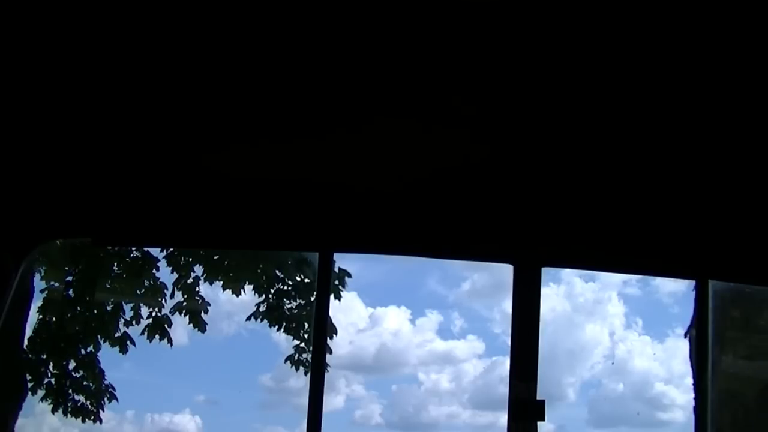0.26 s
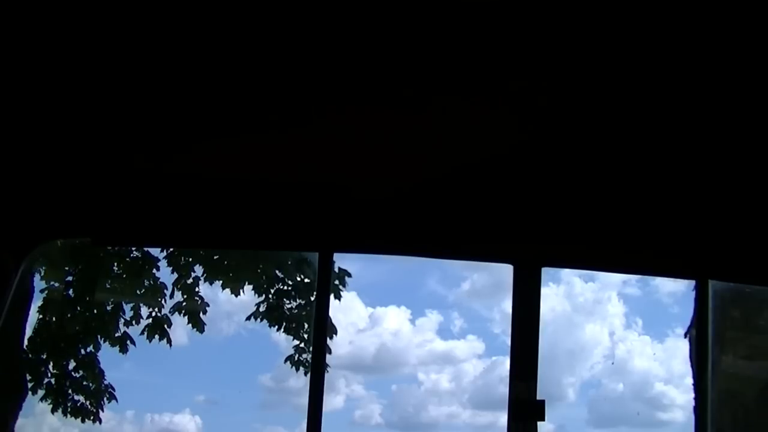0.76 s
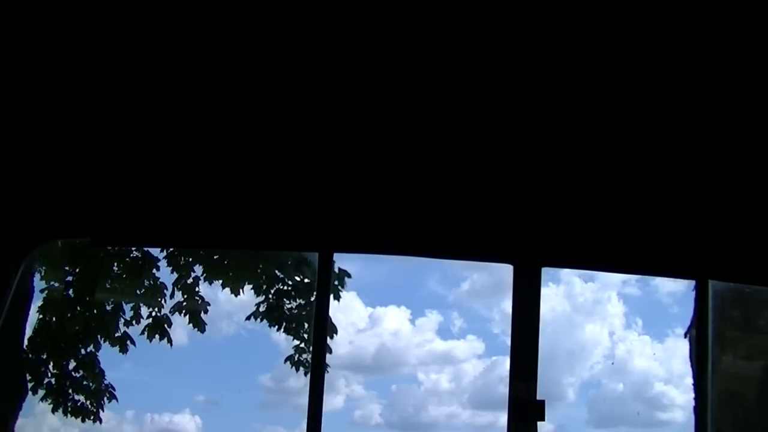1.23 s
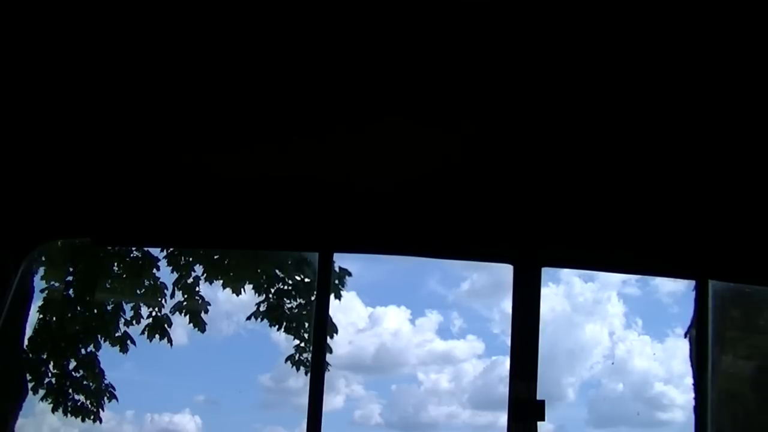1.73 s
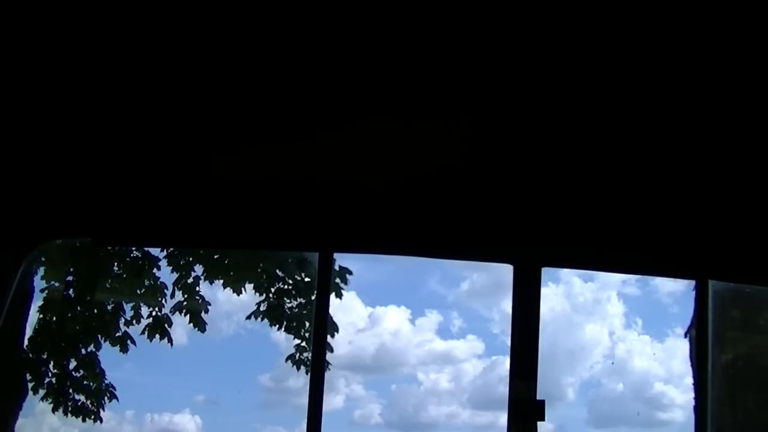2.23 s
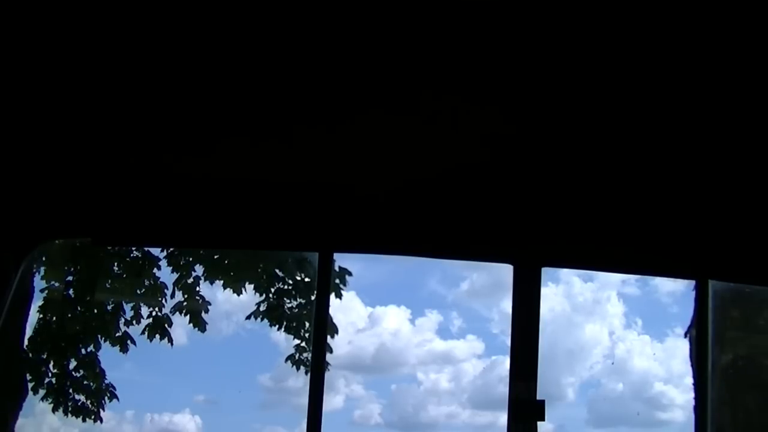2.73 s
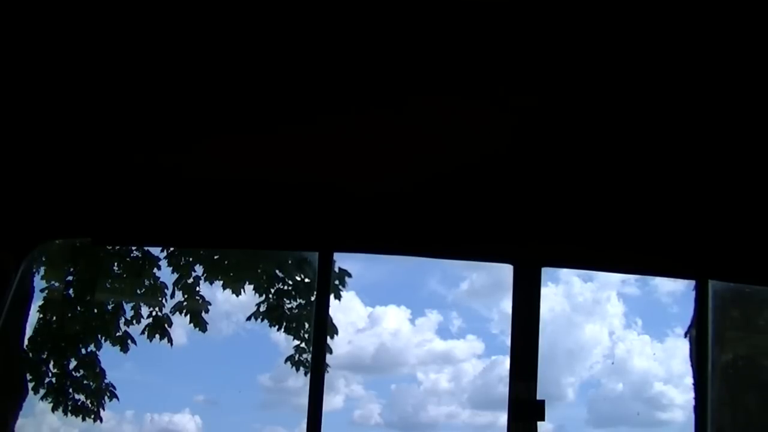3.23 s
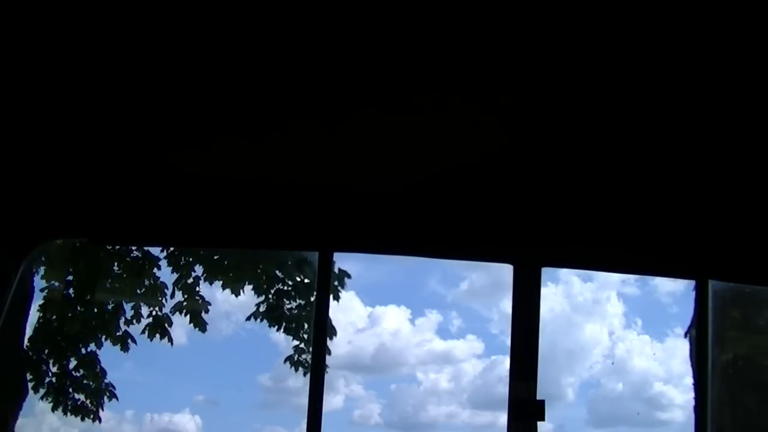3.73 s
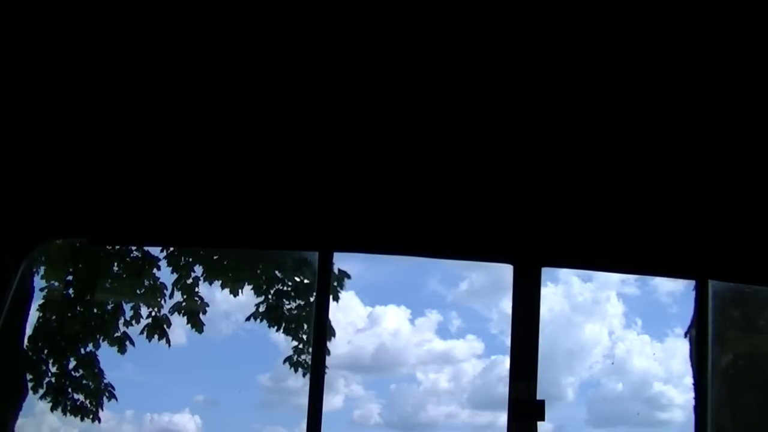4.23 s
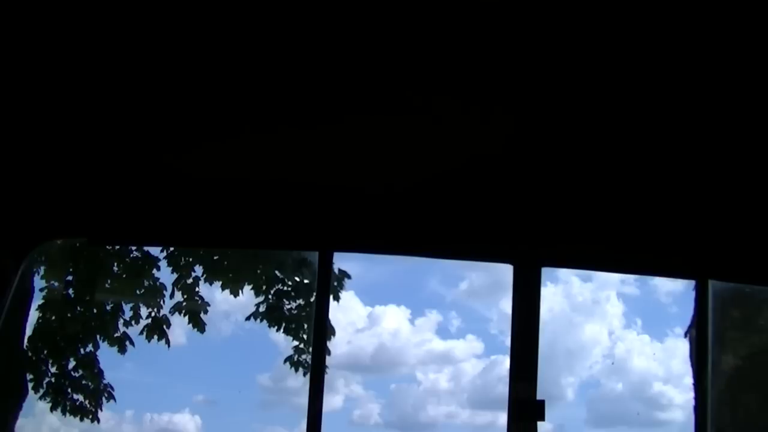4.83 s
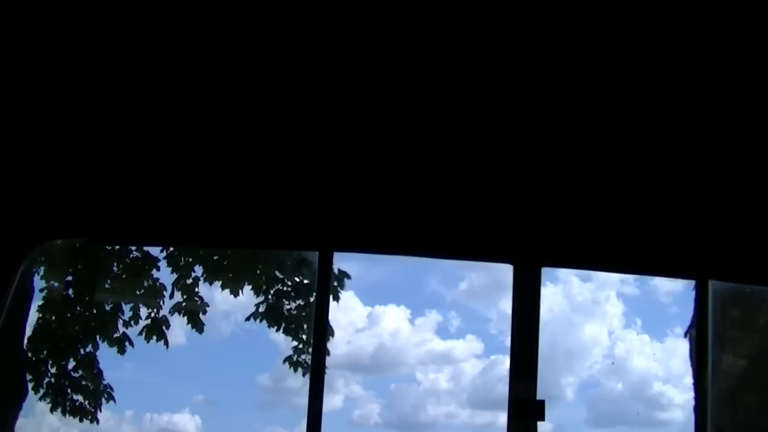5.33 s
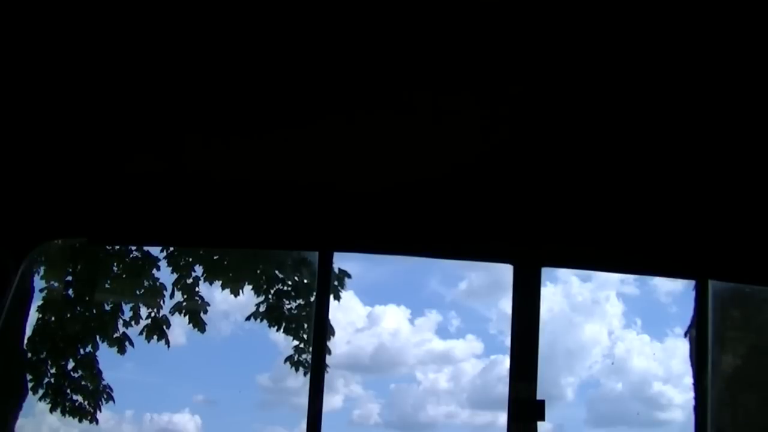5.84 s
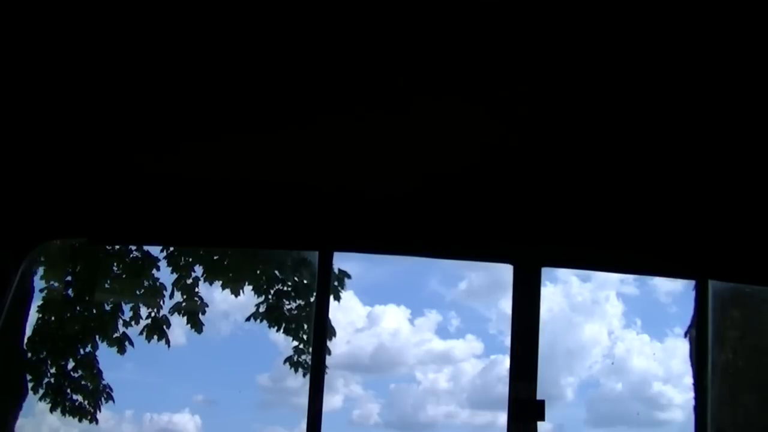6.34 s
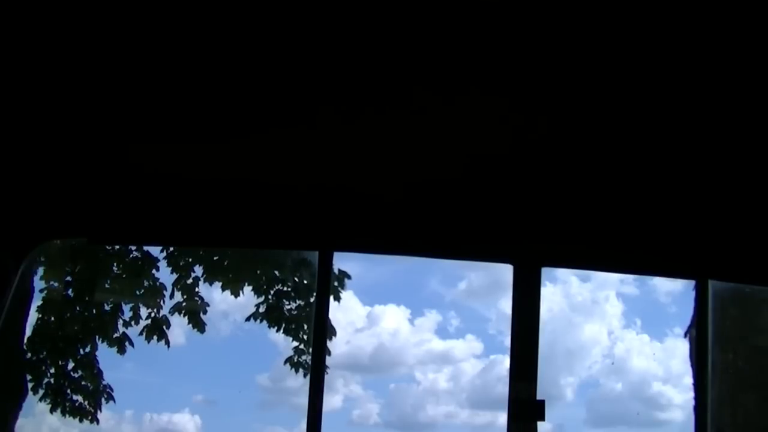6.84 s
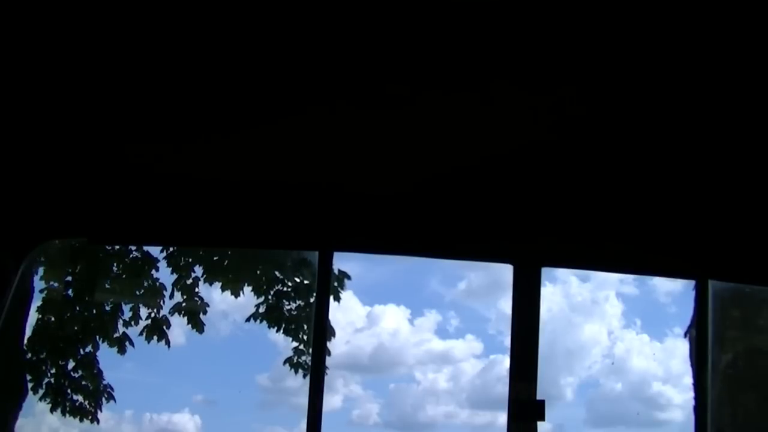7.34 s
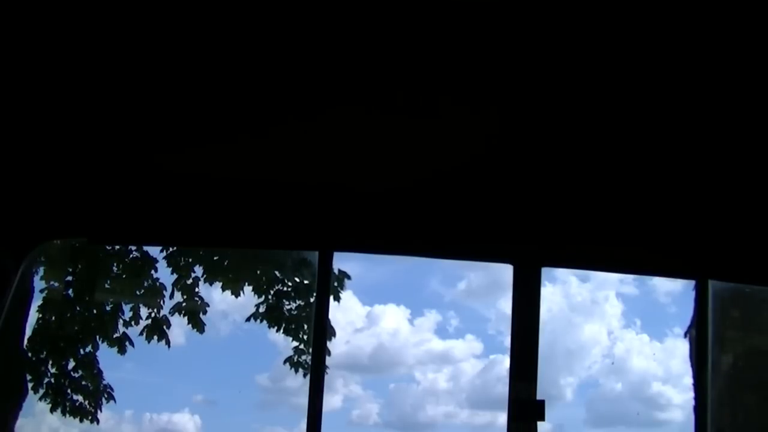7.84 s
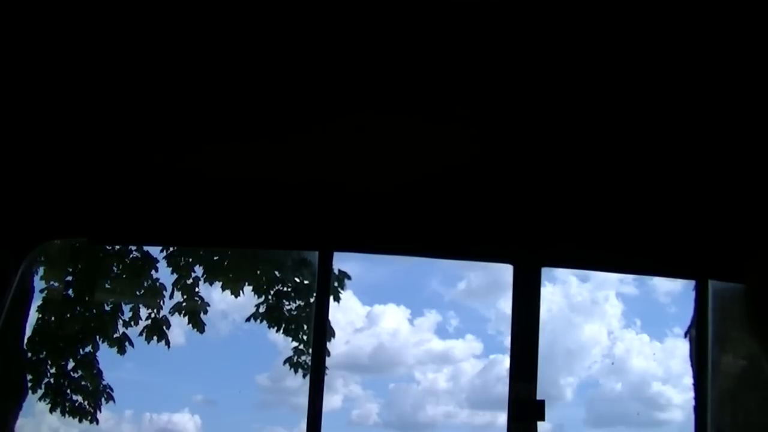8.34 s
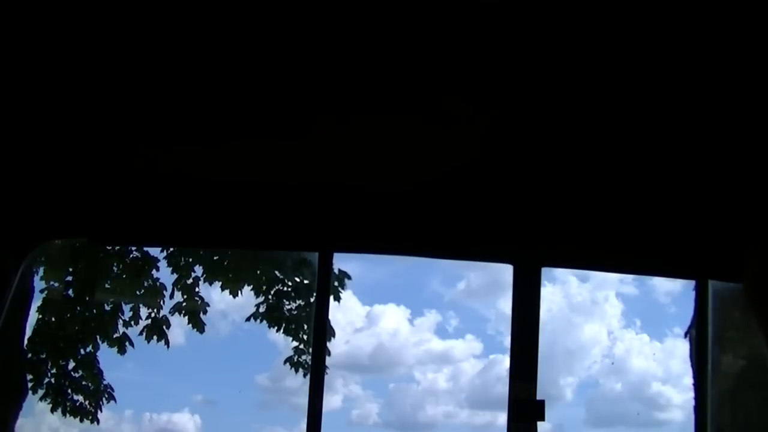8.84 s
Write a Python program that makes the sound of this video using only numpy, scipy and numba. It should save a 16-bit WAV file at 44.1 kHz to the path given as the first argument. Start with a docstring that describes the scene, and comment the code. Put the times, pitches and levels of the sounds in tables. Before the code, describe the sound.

Irregular knocks, creaky scrapes and plastic ticks ring hollowly in a vehicle cabin as a panel is worked loose, with faint insects outside.

```python
"""Inside a truck cab, a hand pries plastic trim loose: knocks, short scrapes and steady rubbing are noise forces
that ring one panel, steel shell and cabin air. A dragged tool and a strained clip sing along in narrow bands;
tabs tick as short noise bursts, and padding thumps and a small metal tool tinkles as decaying sines.
Through the window come filtered noise for hiss, insects and a low hum.
The recorder turns its gain down after loud blows."""
import sys
import numpy as np
from scipy import signal
from scipy.fft import rfft, irfft
from scipy.io import wavfile
from scipy.ndimage import uniform_filter1d
from numba import njit

SR = 44100
rng = np.random.default_rng(int(sys.argv[2]) if len(sys.argv) > 2 else 0)


def to_wav(sig):
    """Store sig (one row per channel, or 1-D mono) as 16-bit WAV at the path in sys.argv[1].

    Samples outside -1..1 are clipped; the rate is SR.
    """
    pcm = np.clip(np.atleast_2d(sig), -1, 1) * 32767
    pcm = np.round(pcm).astype(np.int16)
    wavfile.write(sys.argv[1], SR, pcm.T)  # frames by channels


N = 400428
T = np.arange(N) / SR
PORT_SIGNS = np.array([[1], [-1]])  # a difference signal adds on the left and subtracts on the right


def undb(db):
    """Level law: amplitude ratio of a level in dB."""
    return 10 ** (np.asarray(db) / 20)


def unit(x):
    """Normalisation by mean power: rms 1."""
    return x / np.sqrt(np.mean(x ** 2))


def unit_energy(x):
    """Normalisation by total energy: sum of squares 1."""
    return x / np.sqrt(np.sum(x ** 2))


def read(table, hz):
    """Interpolation of a (Hz, value) table along a log-frequency axis."""
    f, v = np.transpose(table)
    return np.interp(np.log(hz + 1), np.log(f), v)


def butter(x, hz, kind="low"):
    """Fourth-order Butterworth filtering, flat in its passband."""
    return signal.sosfilt(signal.butter(4, hz, kind, fs=SR, output="sos"), x)


def coloured(size, gain):
    """Spectral shaping: white noise times an amplitude gain(Hz)."""
    return irfft(rfft(rng.standard_normal(size)) * gain(np.fft.rfftfreq(size, 1 / SR)), size)


def noise_band(hz, width):
    """Narrow-band noise of Gaussian spectrum and rms 1; the width spans two standard deviations."""
    return unit(coloured(N, lambda f: np.exp(-(2 * (f - hz) / width) ** 2 / 2)))


def walk(rate):
    """Slow random modulation: levels held 1 / rate s and smoothed twice; rms near 1."""
    hold = int(SR / rate)
    steps = np.repeat(rng.standard_normal(N // hold + 1), hold)
    return unit(uniform_filter1d(uniform_filter1d(steps, hold), hold)[:N])


# spectrum of the outdoor hiss: frequency_hz [Hz], relative_level_db [dB per Hz]
AIR = [(24, -64), (40, -26.5), (112, -8), (215, -4.5), (337, 0), (1020, -1.5), (1720, -4.5), (1900, 1.5),
       (2260, -2.5), (7930, -8), (16000, -17.5)]
AIR_DB, AIR_SIDE_DB = -55, -8.5  # hiss level; gain of its left-right difference
AIR_SIDE_TOP_HZ = 8900  # low-pass corner of the hiss's left-right difference


def hiss():
    """Broadband noise with a slowly wavering level, as middle and left-right difference."""
    return [unit(coloured(N, lambda f: undb(read(AIR, f)))) * undb(AIR_DB + 0.31 * walk(2.104))
            for _ in range(2)]


# insect choirs: centre_hz [Hz], width_hz [Hz], level_db [dB], throb_rate [per s], waver_db [dB]
INSECTS = [(1880, 80, -73, 0, 4), (4400, 340, -66.5, 0, 5), (8060, 130, -72, 19, 3)]


def insects():
    """Amplitude modulation of narrow noise bands: all waver at random and one throbs."""
    out = np.zeros(N)
    for hz, width, db, throb, waver_db in INSECTS:
        band = noise_band(hz, width)
        gate = np.exp(1.5 * (np.cos(2 * np.pi * throb * T) - 1))
        out += band * unit(gate) * undb(db + waver_db * np.tanh(walk(17.0)))
    return out


def hum(centre_hz=118.4, width_hz=21, level_db=-77):
    """Narrow-band noise heard as a faint low hum from far away."""
    return undb(level_db) * noise_band(centre_hz, width_hz)


def outdoors():
    """Superposition of hiss, insects and hum; only the hiss differs between the ports."""
    mid, side = hiss()
    mid = mid + insects() + hum()
    return mid + undb(AIR_SIDE_DB) * butter(side, AIR_SIDE_TOP_HZ) * PORT_SIGNS


def grit(per_s, scatter_db, cap_db=15.0):
    """Stick-slip friction: clicks at random moments and of very uneven size; rms 1."""
    chance = rng.random((3, N))
    slips = chance[0] < per_s / SR
    size_db = np.minimum(-scatter_db * np.log(chance[2] + 1e-9), cap_db)
    return unit(slips * np.sign(chance[1] - .5) * undb(size_db))


# steady pressure of hand and tool: time_s [s], pressure_db [dB]
RUB = [(0.0, -70), (1.01, -78), (1.29, -60.5), (2.3, -78), (2.7, -62), (2.95, -62.5), (3.6, -51),
       (3.8, -45), (4.2, -48), (4.4, -42), (4.73, -51.5), (5.06, -48.5), (5.28, -55.5), (6.25, -50.5),
       (6.68, -51), (6.96, -62), (7.51, -71.5), (7.74, -52.5), (8.44, -53.5), (8.7, -43.5), (9.08, -47)]
RUB_BASS_DB = 0  # over middle
RUB_TREBLE_DB, RUB_TREBLE_SLOPE = -56, 0.48  # treble at -50 dB pressure; its gain per dB of pressure


def rub():
    """Sustained friction: dense grit follows the pressure, and each frequency zone wavers by itself."""
    pressure = np.interp(T, *np.transpose(RUB))
    treble = RUB_TREBLE_DB + RUB_TREBLE_SLOPE * (pressure + 50)
    zone_db = pressure, pressure + RUB_BASS_DB, treble
    force = np.array([undb(db + 3.4 * walk(25)) for db in zone_db])
    return force * grit(4000, scatter_db=2.5)


# blows: start_s [s], force_db [dB], depth_db [bass over middle, dB], sharpness_db [treble over middle, dB]
KNOCKS = [(0.17, -25, 17, 10.5), (0.487, -26, -5, -26), (1.386, -28, 3.5, 1), (1.619, -23, 2.5, -2),
          (2.132, -25, 4.5, -18), (2.422, 0, -1.5, -20.5), (2.718, 3.5, 2, -16), (2.732, -6, 3.5, -19),
          (3.092, -15.5, 7.5, -16), (3.14, -1.5, 3, -16), (3.303, -18, 7.5, -35), (3.611, -1.5, -21, -24),
          (3.737, 20.5, -13.5, -9.5), (3.993, -3.5, 8, 0), (4.172, -2, -1, -4.5), (4.456, -3.5, 5.5, -2.5),
          (4.502, -16, 15, 0), (4.639, -30, 12, -45), (4.804, 0.5, -15, -17), (4.819, -9, -3, -17),
          (5.081, -4.5, -8, -24), (5.642, 1, -5, -27), (6.37, 13, 0.5, -10), (6.542, -14.5, 3, -9),
          (6.753, -5.5, -11, -19), (7.221, -26.5, -3, -0.5), (7.522, -26, 3, 5), (7.6, -17.5, -1.5, -6.5),
          (7.651, -14.5, 6.5, -11), (8.466, -22, 0, -6), (8.559, 2, -27, -20), (8.757, 6, 2.5, -14.5),
          (8.839, -8, -9, -12.5), (9.042, -12.5, 4, -10)]
RING_DB, RING_PER_DEPTH = -0.5, 0.1  # share of a blow that rings on; less when bass is weak (dB per dB)


def knocks(contact=0.48, chatter_t60=0.036, rattle_t60=0.12):
    """Impact: contact and short chatter excite the crack, a longer rattle keeps the ring dense."""
    size = SR // 5
    crack, rung = np.zeros((2, 3, N + size))
    for s, force_db, depth, sharpness in KNOCKS:
        zone_db = force_db + np.array([0, depth, sharpness])
        ring_db = RING_DB + RING_PER_DEPTH * min(depth, 0)
        at = slice(int(s * SR), int(s * SR) + size)
        for force, t60, share_db in ((crack, chatter_t60, 0), (rung, rattle_t60, ring_db)):
            sparse = rng.standard_normal(size) * (rng.random(size) < .15)
            blow = unit_energy(sparse * undb(-60 * T[:size] / t60))
            blow[0] += contact
            force[:, at] += undb(share_db) * undb(zone_db)[:, None] * blow
    return crack[:, :N], rung[:, :N]


# slides that swell and fade: start_s [s], length_s [s], pressure_db [dB], brightness_db [dB]
SCRAPES = [(0.293, 0.036, -60, 13), (0.561, 0.1, -53, -9.5), (0.686, 0.063, -53.5, 11.5),
           (1.222, .14, -60, 9), (1.962, 0.18, -56.5, 9.5), (2.452, 0.3, -47.5, -7),
           (2.585, 0.14, -48.5, -5), (2.879, 0.048, -37.5, 8), (3.133, 0.14, -47, 6),
           (3.338, 0.077, -51.5, 10), (3.525, 0.16, -45.5, 6.5), (3.593, 0.24, -37, -3.5),
           (3.753, 0.11, -30.5, -18.5), (3.895, 0.12, -39, 1), (3.999, 0.059, -14, 0.5),
           (4.292, 0.024, -16.5, 0), (4.318, 0.068, -12, 1.5), (4.371, 0.086, -21, -5.5),
           (4.477, 0.065, -21.5, -2), (4.693, 0.069, -40.5, 3.5), (4.826, 0.037, -39.5, -11),
           (4.993, 0.082, -41, -4.5), (5.113, 0.076, -40, 5.5), (5.177, 0.086, -46.5, 11),
           (5.283, 0.013, -45, 0), (5.402, 0.069, -40, 1.5), (5.524, 0.021, -52, 9),
           (5.98, 0.081, -44, -3.5), (6.097, 0.099, -44, 2.5), (6.483, 0.038, -40, -14),
           (6.677, 0.086, -40, -1.5), (6.76, 0.06, -35, -3), (7.621, 0.044, -45.5, -12),
           (7.69, 0.069, -39, -3), (8.118, 0.12, -45.5, -1), (8.297, 0.076, -39.5, 4),
           (8.644, 0.049, -51, 12), (9.013, 0.035, -51, 2)]
SCRAPE_BASS_DB, SCRAPE_TREBLE_DB = -5.5, -9  # over middle, before brightness tilts the balance


def scrapes(rise=0.3, fall=0.59):
    """Brief friction: grit swells and fades, and brightness trades bass for treble."""
    force = np.zeros((3, N))
    for start, length, press_db, bright in SCRAPES:
        zone_db = press_db + np.array([0, SCRAPE_BASS_DB - bright, SCRAPE_TREBLE_DB + bright])
        span = min(length, .09)  # rise and fall are shares of this time in s
        inside = np.minimum((T - start) / rise, (start + length + 0.012 - T) / fall) / span
        force += undb(zone_db)[:, None] * np.clip(inside, 0, 1)
    return force * undb(np.tanh(walk(60))) * grit(5000, scatter_db=1.5)


# colour of trim, shell and cabin: frequency_hz [Hz], relative_level_db [dB per Hz]
SHELL = [(59, -62), (100, -25), (340, 6), (697, -1.5), (808, 5), (2270, -6.5), (2750, -15), (3540, -12.5),
         (4100, -22), (5870, -22), (6530, -26), (10800, -27), (15500, -45)]


def tail(t60_table):
    """Statistical reverberation: half-octave noise bands, each with its own decay; rms 1."""
    t, out = T[:SR // 2], 0
    for hz in 85 * 2 ** np.arange(0, 7.6, 1 / 2):
        def band_gain(f):
            return undb(read(SHELL, f)) * np.clip(1 - 2 * abs(np.log2((f + 1) / hz)), 0, 1)
        decay = undb(-60 * t / read(t60_table, hz)) * np.minimum(t * hz, 1)  # builds over one cycle
        out = out + coloured(len(t), band_gain) * unit_energy(decay)
    return unit(out)


# decay of the crack: frequency_hz [Hz], t60_s [s]
CRACK_T60 = [(200, 0.24), (1000, 0.0083), (8000, 0.081)]


def crack_response():
    """Impulse response of a damped crack, its middle frequencies dying fastest."""
    return tail(CRACK_T60)


# modes of the panel: frequency_hz [Hz], width_hz [Hz], relative_level_db [dB]
PANEL = [(431, 117, 3.5), (905, 18.7, -30), (1703, 58, 4), (2347, 31, 3), (3053, 30, -4.5),
         (3220, 110, -10), (3540, 13, -32), (4466, 20, 2), (4746, 140, -6.5), (4940, 29, -5),
         (5930, 570, -11)]
# decay of shell and cabin: frequency_hz [Hz], t60_s [s]
SHELL_T60 = [(150, 0.8), (400, 0.54), (1000, 0.21), (2800, 0.18), (7000, 0.33), (15000, 0.033)]
PANEL_DB = -3  # panel modes over the long tail


def ring(scatter_db=1.0):
    """Modal superposition: panel modes over the long tail, woken unequally at each spot."""
    t, modes = T[:SR // 2], 0
    for hz, w, db in PANEL:
        # a mode w Hz wide fades as exp(-pi w t); its spectral peak is its size over w
        size = undb(db + scatter_db * rng.standard_normal()) * w
        modes = modes + size * np.exp(-np.pi * w * t) * np.sin(2 * np.pi * hz * t)
    return tail(SHELL_T60) + undb(PANEL_DB) * unit(modes)


def zones(response, low_hz=601, high_hz=3180):
    """Band splitting: middle, bass and treble parts of a response, each of energy 1."""
    bands = ([low_hz, high_hz], "band"), (low_hz, "low"), (high_hz, "high")
    return [unit_energy(butter(response, hz, kind)) for hz, kind in bands]


def through(force, response):
    """Linear convolution: each zone of a force sounds through its part of a response."""
    return sum(signal.oaconvolve(f, z)[:N] for f, z in zip(force, zones(response)))


def taps(events, modes, contact_s):
    """Modal decay after light taps; the push takes a moment to build."""
    out = np.zeros(N)
    for s, event_db in events:
        t = np.clip(T - s, 0, 1)
        push = 1 - np.exp(-t / contact_s)
        for hz, db, t60 in modes:
            out += push * undb(event_db + db - 60 * t / t60) * np.sin(2 * np.pi * hz * t)
    return out


# taps of a small metal tool: start_s [s], level_db [dB]
TINKS = [(.545, -42), (.597, -18.5), (0.603, -22)]
# modes of the tool: frequency_hz [Hz], relative_level_db [dB], t60_s [s]
TOOL = [(1785, -8.5, 0.047), (1920, -8.5, .05), (2117, -5.5, 0.1), (2500, -11, 0.023), (3705, -22, 0.093),
        (4260, -18, 0.028)]


def tinkles():
    """Free vibration of a small metal tool after a quick contact."""
    return taps(TINKS, TOOL, contact_s=0.0013)


# dry ticks and snaps of plastic tabs: start_s [s], peak_db [dB], centre_hz [Hz]
TICKS = [(.7946, -35, 1090), (1.0787, -32, 2400), (4.311, -8, 1500), (4.3445, -3, 1700), (4.366, -3, 1900),
         (4.637, -35, 3200), (4.9314, -36, 2950), (5.0826, -25, 2200), (6.0755, -30, 2400),
         (6.2312, -26, 1200), (6.33, -27.5, 2400), (8.035, -36, 2000)]
TICK_T60_S, TICK_OCTAVES = 0.026, 0.76  # decay time; spread of the band


def ticks():
    """Heavily damped impulse: each tick is a short burst of noise in a band around its own centre."""
    size = SR // 20
    out = np.zeros(N + size)
    for s, peak_db, hz in TICKS:
        burst = coloured(size, lambda f: np.exp(-(np.log2((f + 1) / hz) / TICK_OCTAVES) ** 2))
        tick = burst * undb(-60 * T[:size] / TICK_T60_S)
        out[int(s * SR):int(s * SR) + size] += undb(peak_db) * tick / np.abs(tick).max()
    return out[:N]


# bumps of a palm or knee on the padded panel: start_s [s], level_db [dB]
THUMPS = [(0.86, -46), (1.238, -32.5), (1.274, -39), (1.35, -46), (1.627, -50), (1.99, -45), (8.463, -29)]
# modes of the padding: frequency_hz [Hz], relative_level_db [dB], t60_s [s]
PADDING = [(151, -10.5, 0.116), (224, 3, 0.06), (335, -5, .06)]


def thumps():
    """Soft impact: a slower contact on low modes."""
    return taps(THUMPS, PADDING, contact_s=0.0053)


def sing(force, start_s, end_s, modes):
    """Forced resonance: a part touched for a while rings in narrow bands, relative to the force."""
    touched = force * (T > start_s) * (T < end_s)
    out = np.zeros(N)
    for hz, w, db in modes:
        resonance = signal.lfilter(*signal.iirpeak(hz, hz / w, SR), touched)
        out += undb(db) * np.sqrt(SR / np.pi / w) * resonance  # a narrow band passes less power
    return out


# bands of the edge: centre_hz [Hz], width_hz [Hz], relative_level_db [dB]
DRAG = [(1200, 79, 6.5), (1320, 60, -3), (2440, 150, 0), (3120, 110, -12.5)]


def dragged_edge(force):
    """Friction-driven resonance while the tool is dragged along an edge."""
    return sing(force, 2.44, 2.72, DRAG)


# modes of the steel clip: centre_hz [Hz], width_hz [Hz], relative_level_db [dB]
CLIP = [(3480, 33, -7), (5070, 30, -12), (6160, 25, -14), (7200, 25, -29)]


def strained_clip(force):
    """Sympathetic resonance of a steel clip under strain."""
    return sing(force, 3.72, 4.56, CLIP)


# left-right difference: frequency_hz [Hz], relative_level_db [dB]
WIDTH = [(150, -61), (600, -25), (2400, -17.5), (12000, -24)]


def widen(mid):
    """Decorrelation: a short scattered echo enters the two ports with opposite signs."""
    decay = undb(-60 * T[:4096] / .08)
    scatter = coloured(len(decay), lambda f: undb(read(WIDTH, f))) * unit_energy(decay)
    return mid + signal.oaconvolve(mid, scatter)[:N] * PORT_SIGNS


def trim(slide_ring_db=-5.0, radiate_hz=144):
    """Source-filter model: forces wander over four spots, each with its own crack and ring."""
    crack, rung = knocks()
    slide = rub() + scrapes()
    spots = np.array([walk(24) for _ in range(4)])
    spots = spots / np.sqrt(np.sum(spots ** 2, axis=0))  # constant total power
    mid = np.zeros(N)
    for w in spots:
        mid += through(w * (crack + slide), crack_response())
        mid += through(w * (rung + undb(slide_ring_db) * slide), ring())
    mid += dragged_edge(slide[0]) + strained_clip(rung[2] + slide[2]) + thumps() + ticks()
    return widen(butter(mid, radiate_hz, "high"))  # panels send out little bass


def scene():
    """Superposition of everything heard from the seat."""
    return outdoors() + trim() + tinkles()


@njit
def follow(x, attack, release):
    """Envelope detection: a level meter, quick up and slow down."""
    y, e = np.empty(len(x)), 0.
    for i in range(len(x)):
        e += (x[i] - e) * (attack if x[i] > e else release)
        y[i] = e
    return y


GAIN_TOP_DB, GAIN_RATIO = -40, 1.167  # gain falls above this level; dB in per dB out
GAIN_ATTACK_S, GAIN_RELEASE_S = 0.032, 0.42
TOP_HZ = 15900


def record(dry):
    """Dynamic compression, peak clipping and a low-pass; the left port is a touch weaker."""
    level = np.abs(dry).mean(axis=0)
    meter = follow(level, 1 / (GAIN_ATTACK_S * SR), 1 / (GAIN_RELEASE_S * SR))
    gain = np.minimum(undb(GAIN_TOP_DB) / (meter + 1e-9), 1) ** (1 - 1 / GAIN_RATIO)
    ports = undb([[-.25], [.25]])
    clipped = np.clip(dry * gain * ports, -1, 1)
    return signal.sosfilt(signal.ellip(10, .2, 70, TOP_HZ, fs=SR, output="sos"), clipped)


dry = scene()
out = record(dry)
to_wav(out)
```